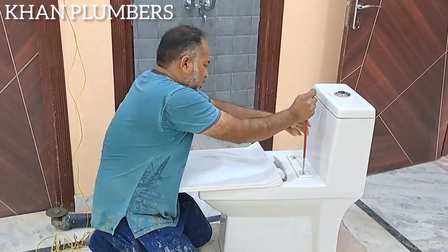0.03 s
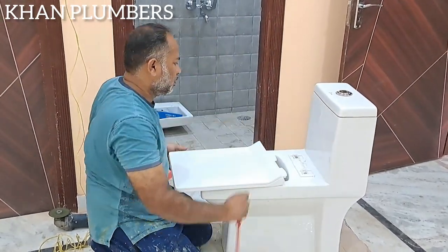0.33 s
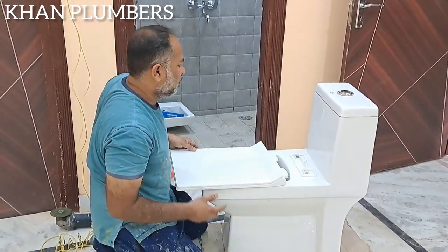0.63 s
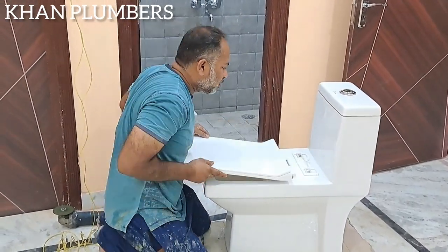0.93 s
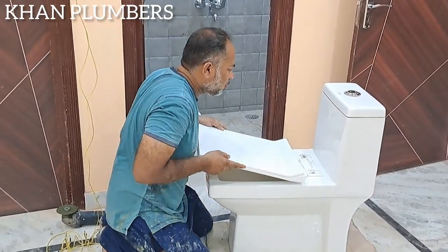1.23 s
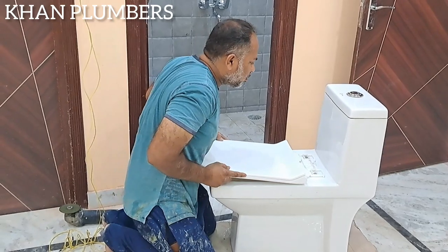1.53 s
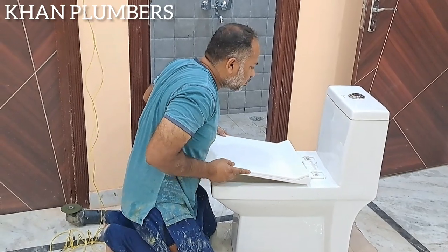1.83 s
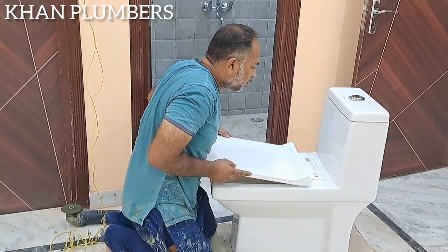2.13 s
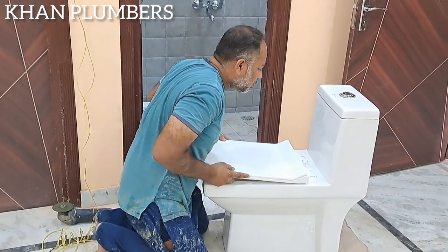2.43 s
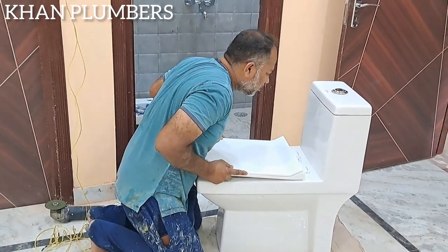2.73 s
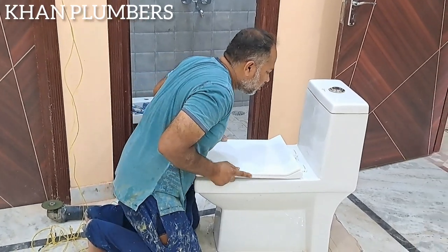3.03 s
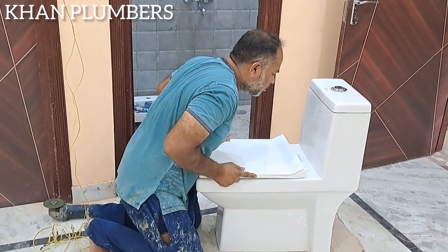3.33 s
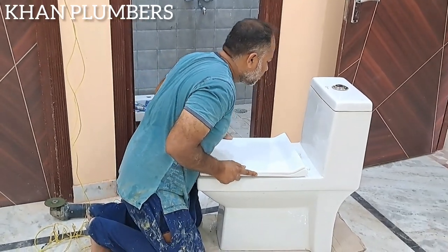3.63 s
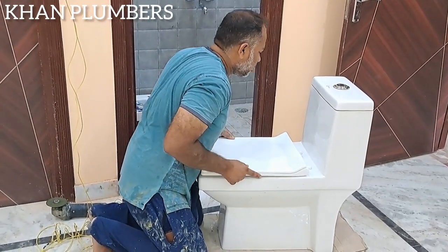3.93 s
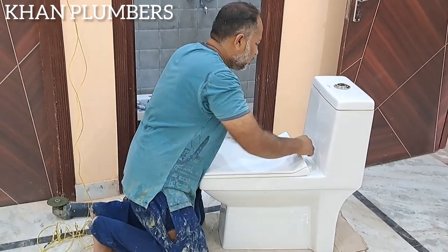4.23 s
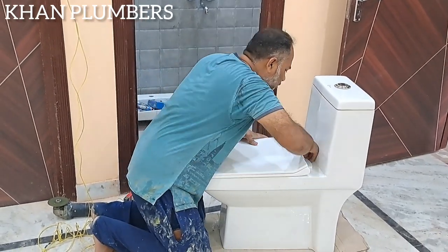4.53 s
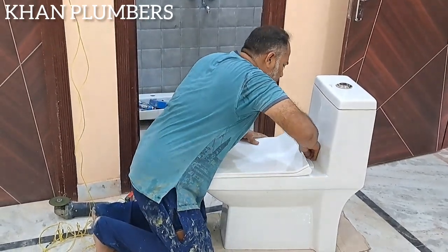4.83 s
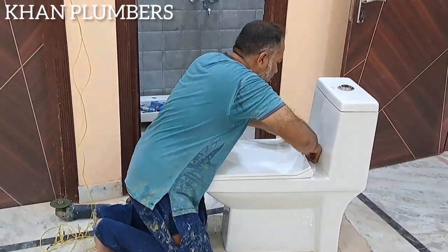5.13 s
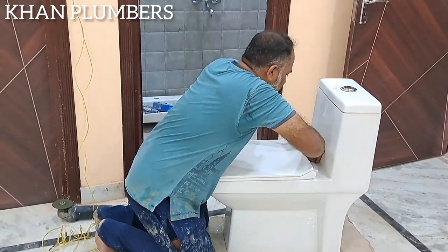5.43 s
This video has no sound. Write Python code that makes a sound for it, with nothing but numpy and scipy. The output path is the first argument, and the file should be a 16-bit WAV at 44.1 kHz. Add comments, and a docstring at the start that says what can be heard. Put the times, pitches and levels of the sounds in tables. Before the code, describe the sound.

A screwdriver bounces on a stone floor with a few quick ringing clicks. Hard plastic clacks follow at uneven intervals as a toilet seat is set down, rocked and pressed onto a ceramic bowl, which answers later with a low hollow thump. Dull body shuffles, short scrapes and thin hinge squeaks fill the gaps. Every contact echoes in the tiled room, stronger in the right microphone, above faint hiss and rumble.

```python
"""A bare tiled room with a stone floor, ringing after every contact. A screwdriver is put down and
clatters; a plastic toilet seat is lifted, set on its ceramic bowl, shifted and pressed home.
The seat clacks and flexes as it rocks from edge to edge, and its weight makes the hollow bowl boom.
Hinges squeak, arms and knees shuffle and hands rub, over faint hiss and a low rumble.
The right microphone faces the work."""
import sys
import numpy as np
from scipy import signal
from scipy.fft import rfft, irfft, next_fast_len
from scipy.io import wavfile
from scipy.ndimage import map_coordinates

SR = 44100
rng = np.random.default_rng(int(sys.argv[2]) if len(sys.argv) > 2 else 0)


def persist_wave(psi):
    """Save psi, clipped to +-1, as 16-bit WAV."""
    counts = np.round(np.clip(psi, -1, 1) * 32767).astype(np.int16)
    wavfile.write(sys.argv[1], SR, np.atleast_2d(counts).T)


N = 246519


def amp(db):
    """Decibels to gain."""
    return 10 ** (np.asarray(db) / 20)


def unit_rms(x):
    """x scaled to an rms of 1."""
    return x / np.sqrt(np.mean(x ** 2) + 1e-20)


def curve_at(points, hz):
    """Read (freq_hz, value) breakpoints on a log frequency axis."""
    freqs, values = np.transpose(points)
    return np.interp(np.log(hz + 1), np.log(freqs), values)


def eq(x, gain):
    """Shape x with the response gain(hz)."""
    size = next_fast_len(x.shape[-1] + SR // 4)
    return irfft(rfft(x, size) * gain(np.fft.rfftfreq(size, 1 / SR)), size)[..., :x.shape[-1]]


def resonances(modes, hz):
    """Joint gain of steep-sided peaks, each (pitch_hz, width_hz, level_db)."""
    peaks = (amp(db) / (1 + ((hz * hz - pitch * pitch) / (width * hz + 1)) ** 2)
             for pitch, width, db in modes)
    return np.sqrt(sum(peak ** 2 for peak in peaks))


def impulse(gain, size=8192):
    """A minimum-phase hit with the spectrum gain(hz): attack first, ring after."""
    cepstrum = irfft(np.log(gain(np.fft.rfftfreq(size, 1 / SR)) + 1e-6))
    cepstrum[1:size // 2] *= 2
    cepstrum[size // 2 + 1:] = 0
    return irfft(np.exp(rfft(cepstrum)))


def add(track, start_s, sound):
    """Mix a sound into a stereo track."""
    part = track[:, max(round(start_s * SR), 0):][:, :sound.shape[-1]]
    part += sound[..., :part.shape[-1]]


# How alike the room sounds left and right: freq_hz, correlation
STEREO_LIKENESS = [(100, 0.94), (270, 0.88), (450, 0.72), (800, 0.046), (1500, 0.0067)]
def diffuse(pair):
    """Two unrelated signals become a diffuse field: long waves reach both microphones alike."""
    angle = lambda hz: np.arccos(np.clip(curve_at(STEREO_LIKENESS, hz), -1, 1)) / 2
    mid, side = eq(pair, lambda hz: np.array([np.cos(angle(hz)), np.sin(angle(hz))]))
    return np.array([mid + side, mid - side])


# Reverb time of the tiled room: freq_hz, t60_s
ROOM_DECAY = [(100, 1.2), (170, 1.14), (280, 0.85), (480, 0.89), (900, 0.95), (1800, 0.82), (3200, 0.67),
              (5000, 0.61), (7000, 0.49), (10000, 0.36), (15000, .27)]
def in_room(sound, direct_db, crack_s=.0014, build_s=.0019, walls_db=-11, walls_s=.035, echoes=20):
    """A short direct crack, a few wall echoes and a dense tail that dies faster in the treble."""
    hz, t, noise = signal.stft(rng.standard_normal((2, SR * 5 // 4)), SR, nperseg=256)
    t60 = curve_at(ROOM_DECAY, hz)[:, None]
    fade = amp(-60 * t / t60) * np.sqrt(2 * np.log(1000) / (t60 * SR))  # equal energy in every band
    response = signal.istft(noise * fade, SR, nperseg=256)[1]
    age = np.arange(response.shape[1]) / SR
    response *= 1 - np.exp(-age / build_s)
    for channel in response:
        delays = (rng.uniform(0.092, 1, echoes) * walls_s * SR).astype(int)
        channel[delays] += amp(walls_db) * rng.standard_normal(echoes) / np.sqrt(echoes)
    # sound leaves the whole surface, so even the first arrival is spread over a few milliseconds
    crack_age = age[age < 10 * crack_s]
    crack = rng.standard_normal((2, len(crack_age))) * np.exp(-crack_age / crack_s)
    add(response, 0, amp(direct_db) * crack / np.linalg.norm(crack, axis=1, keepdims=True))
    return signal.fftconvolve(sound[None], diffuse(response), axes=1)


def wobble(knots_per_s):
    """A smooth random curve as long as the scene."""
    knots = rng.standard_normal(int(N * knots_per_s / SR) + 4)
    return map_coordinates(knots, [np.arange(N) * knots_per_s / SR])


# Colour of the steady hiss: freq_hz, gain_db
HISS_EQ = [(25, -14), (55, -11), (170, -7.5), (270, -16.5), (500, -19), (800, -19), (1500, -17.5),
           (3200, -27.5), (5000, -21.5), (7500, -20.5), (10000, -21.5), (16000, -20.5)]
# Level of the low rumble, swelling and fading with the work, under its waver: time_s, level_db
RUMBLE_LEVEL = [(0.0, -69), (0.17, -80), (0.26, -52), (0.67, -58), (1.26, -61), (1.85, -74), (2.01, -64.5),
                (2.21, -77), (2.29, -54.5), (3.56, -64.5), (3.71, -81), (3.83, -52), (4.03, -81.5),
                (4.16, -55), (4.95, -87.5), (5.23, -82), (5.26, -67), (5.59, -90)]
def room_tone(hiss_db=-65, rumble_hz=51.3, width_hz=45, waver_db=5.5):
    """Faint steady room noise and a low rumble that comes and goes."""
    noise = lambda: diffuse(rng.standard_normal((2, N)))
    hiss = eq(noise(), lambda hz: amp(curve_at(HISS_EQ, hz)))
    rumble = eq(noise(), lambda hz: resonances([(rumble_hz, width_hz, 0)], hz))
    rumble_db = np.interp(np.arange(N) / SR, *np.transpose(RUMBLE_LEVEL))
    rumble_db += waver_db * wobble(knots_per_s=9)
    return amp(hiss_db) * unit_rms(hiss) + amp(rumble_db) * unit_rms(rumble)


# Thin squeaks and tinks of the hinges: start_s, length_s, pitch_hz, width_hz, level_db
HINGE_RUBS = [(0.168, 0.06, 1570, 130, -8), (0.160, .012, 5500, 5800, -15), (1.74, .1, 3130, 150, -9),
              (2.97, .09, 2150, 520, -9), (5.36, .11, 5055, 60, -1.5)]
def hinge_squeaks():
    """Metal fittings rub briefly, each at its own resonance."""
    out = np.zeros((2, N))
    for start_s, length_s, pitch_hz, width_hz, level_db in HINGE_RUBS:
        rub = rng.standard_normal(int(length_s * SR))
        ring = impulse(lambda hz: resonances([(pitch_hz, width_hz, level_db)], hz))
        squeak = signal.fftconvolve(rub / np.linalg.norm(rub), ring)
        add(out, start_s, in_room(squeak, direct_db=-36))
    return out


def friction(length_s, slips_per_s, lateness):
    """Random slips under a pressure that swells and fades; lateness 1 peaks midway, less peaks sooner."""
    n = int(length_s * SR)
    slips = rng.standard_normal(SR) * (rng.random(SR) < slips_per_s / SR)
    pressure = np.sin(np.pi * np.linspace(0, 1, n) ** lateness)
    return unit_rms(slips[:n] * pressure) / np.sqrt(n)  # total energy 1


# Arms and knees shift their weight: start_s, length_s, level_db, centre_hz, width_hz
WEIGHT_SHIFTS = [(0.221, 0.17, 19, 160, 175), (0.338, .085, 28, 275, 250), (0.642, 0.023, 12.5, 203, 202),
                 (0.955, 0.184, 28.5, 135, 54.64), (1.024, 0.05, 12.5, 412, 295),
                 (1.418, 0.058, 21, 282, 112), (1.737, .03, 15.5, 252, 91.5), (2.11, 0.26, 22, 261, 99)]
def body_shuffles(cutoff_hz=680):
    """Padded contacts push only the low notes of the room."""
    out = np.zeros((2, N))
    for start_s, length_s, level_db, centre_hz, width_hz in WEIGHT_SHIFTS:
        band = [(centre_hz, width_hz, level_db)]
        push = impulse(lambda hz: resonances(band, hz) / np.hypot(1, (hz / cutoff_hz) ** 4))
        shuffle = signal.fftconvolve(friction(length_s, slips_per_s=2000, lateness=0.51), push)
        add(out, start_s, in_room(shuffle, direct_db=-13.5))
    return out


# Broad snap of plastic on ceramic: freq_hz, gain_db
SNAP_EQ = [(40, -25), (110, -23), (200, -12), (350, -7), (700, 4), (1200, 1.5), (2200, 1.5), (3200, -2),
           (6000, -5.5), (10000, -2.5), (16000, -5)]
# Stiff modes of the seat's shell: pitch_hz, width_hz, level_db
SHELL_MODES = [(372, 78, -0.8), (462, 170, 0.5), (549, 39, 3), (818, 120, 3.5), (892, 25, 1),
               (1055, 30, -0.5), (1576, 85, 4), (1715, 37, 4), (1883, 260, 3), (2200, 120, 1.5),
               (2420, 56, -1.5), (4920, 1300, -1.5), (7840, 1400, -5)]
def plastic_tone(hz):
    """Colour of the seat's shell: a broad snap with its modes on top."""
    return np.hypot(amp(curve_at(SNAP_EQ, hz)), resonances(SHELL_MODES, hz))


# Seat and clothes slide under the hands: start_s, length_s, level_db, centre_hz
HAND_SLIDES = [(0.268, 0.21, -12.5, 1900), (0.40, 0.12, -4.5, 10790), (1.352, 0.12, -5.5, 1950),
               (1.552, 0.078, -24.5, 6600), (2.129, 0.069, -19, 7400), (2.188, 0.097, -4, 2880),
               (2.926, 0.23, -17, 4940), (5.047, 0.21, -36, 6500), (5.232, 0.33, -22.5, 10500),
               (5.36, .12, -20.5, 3700)]
def hand_slides(peak_db=6, relative_width=.4, reach_hz=3980):
    """Sliding is a run of tiny slips that excite the shell; finer scrapes reach higher."""
    out = np.zeros((2, N))
    for start_s, length_s, level_db, centre_hz in HAND_SLIDES:
        peak = [(centre_hz, relative_width * centre_hz, peak_db)]
        colour = lambda hz: np.hypot(plastic_tone(hz), resonances(peak, hz))
        cutoff_hz = centre_hz + reach_hz
        slip = impulse(lambda hz: colour(hz) / np.hypot(1, (hz / cutoff_hz) ** 3))
        scrape = signal.fftconvolve(friction(length_s, slips_per_s=1500, lateness=.9), slip)
        add(out, start_s, amp(level_db) * in_room(scrape, direct_db=-9))
    return out


# Ring of the shaft and handle: pitch_hz, width_hz, level_db
TOOL_MODES = [(1430, 290, -4), (2110, 100, -7.5), (2870, 110, 2), (4617, 170, 2), (5455, 380, 2.5),
              (6130, 450, 2.5), (6940, 320, 6.5), (7940, 500, 1.5), (11400, 2600, 2.5)]
# Colour of the clatter on stone: freq_hz, gain_db
CLATTER_EQ = [(60, -26), (200, 0.5), (380, 2.5), (620, -9.5), (850, 2.5), (1200, -7), (2500, 3),
              (4000, 1.5), (8000, 3.5), (12000, 1.5), (16000, 0.5)]
# The screwdriver hits the floor: start_s, clatter_db, ring_db, direct_db, per_bounce_db
TOOL_HITS = [(0.524, 10.5, 8, -14, -7), (0.6542, 9.5, 18, -1.5, -2.5), (0.712, 4.5, 6, -7, -2.5),
             (0.757, 4, 3, -5, -9.5)]
def screwdriver(clicks=3, first_flight_s=.0098, flight_ratio=0.42):
    """Handle and tip land in turn and rebound ever faster, ringing the shaft."""
    out = np.zeros((2, N))
    for start_s, clatter_db, ring_db, direct_db, per_bounce_db in TOOL_HITS:
        clatter = lambda hz: amp(clatter_db + curve_at(CLATTER_EQ, hz))
        click = impulse(lambda hz: np.hypot(clatter(hz), amp(ring_db) * resonances(TOOL_MODES, hz)))
        for bounce in range(clicks):
            flown_s = first_flight_s * (1 - flight_ratio ** bounce) / (1 - flight_ratio)
            add(out, start_s + flown_s, amp(bounce * per_bounce_db) * in_room(click, direct_db))
    return out


# Low bending modes of the seat: pitch_hz, width_hz, level_db
FLEX_MODES = [(210.5, 74, 0), (288.8, 62, 1)]
def seat_clack(clack_db, tilt_db, cutoff_hz, flex_db, ring_hz, width_hz, ring_db):
    """Harder contacts are brighter; each bends the seat and favours the modes of the struck spot."""
    def spectrum(hz):
        octaves_up = np.log2(np.hypot(1, hz / 1500))
        force = amp(clack_db + tilt_db * octaves_up) / np.hypot(1, (hz / cutoff_hz) ** 3)
        spot = resonances([(ring_hz, width_hz, ring_db)], hz)
        shell = plastic_tone(hz) * np.hypot(force, spot)
        return np.hypot(shell, amp(flex_db) * resonances(FLEX_MODES, hz))
    return in_room(impulse(spectrum), direct_db=-11.5)


# The seat lands on one edge and rocks onto the other: start_s, rock_s, edge_gain_db, clack_db,
# tilt_db_per_octave, cutoff_hz, flex_db, ring_hz, width_hz, ring_db
SEAT_LANDINGS = [ (0.780, .033, 2.5, 4.5, -4, 8130, 21.5, 2000, 950, 12),
                 (1.141, .009, -6, 6.5, -0.65, 10040, 29.5, 298, 91, 34.5),
                 (1.884, .019, -1.5, 3.5, -3.5, 18000, 24.5, 2410, 584, 15.5),
                 (2.394, .022, 2, -1.5, -6.5, 8900, 26.5, 1006, 240, 16),
                 (2.530, 0.011, -15, -9, -5.5, 6170, 9, 998, 245, 9.5),
                 (2.660, .024, -1, -11, -2, 8730, 18.5, 972, 254, 2),
                 (3.247, .007, -16.5, 24, -4.5, 14560, 31, 927, 320, 34.5),
                 (3.5379, .007, 9.5, -0.5, 2.5, 18440, 6.5, 3550, 970, 9),
                 (4.047, 0.025, 1, -5, -2.5, 6870, 13.5, 2260, 800, 1.5),
                 (4.110, .007, -12.5, -2.5, 0, 5860, 8.5, 1890, 800, 1),
                 (4.187, .015, -4.5, 13, 2.5, 6380, 25, 2340, 950, 16),
                 (4.555, .011, -0.5, -4, -2.5, 9640, -1.5, 1250, 1092, 4),
                 (5.224, .022, -9.5, -11.5, -2.3, 11000, 4, 407, 112.6, 5.5)]
def seat_landings(settle_s=.018):
    """Three contacts a landing: a bright first edge, the other edge with the weight, a soft settling."""
    out = np.zeros((2, N))
    for start_s, rock_s, edge_gain_db, *tone in SEAT_LANDINGS:
        clack_db, tilt_db, cutoff_hz, flex_db, ring_hz, width_hz, ring_db = tone
        edge = seat_clack(clack_db - 1.5, tilt_db + 1.5, cutoff_hz, flex_db - 2, ring_hz, width_hz, ring_db)
        weight = seat_clack(*tone)
        settle = seat_clack(clack_db - 4, tilt_db, cutoff_hz, flex_db - 3, ring_hz, width_hz, ring_db - 4)
        add(out, start_s, amp(edge_gain_db) * edge)
        add(out, start_s + rock_s, weight)
        add(out, start_s + rock_s + settle_s, settle)
    return out


# Notes of the air in the bowl: pitch_hz, level_db, t60_s
BOWL_AIR_MODES = [(168.4, 3.5, 0.54), (138.2, -7.5, .25), (324, -21.5, 0.82), (404.5, -22, 0.8)]
# Thump of the heavy ceramic body: pitch_hz, width_hz, level_db
BOWL_BODY_MODES = [(144.7, 41, 52)]
# The seat's weight lands on the bowl: start_s, level_db
BOWL_HITS = [(4.049, -38), (4.198, -14), (4.555, -54.5), (5.221, -29)]
def bowl_booms(attack_s=0.018):
    """The covered bowl booms at the pitch of its enclosed air, and its body thumps the room."""
    out, t = np.zeros((2, N)), np.arange(SR) / SR
    boom = sum(amp(db - 60 * t / t60) * np.sin(2 * np.pi * hz * t) for hz, db, t60 in BOWL_AIR_MODES)
    boom *= 1 - np.exp(-t / attack_s)
    thump = impulse(lambda hz: resonances(BOWL_BODY_MODES, hz))
    for start_s, level_db in BOWL_HITS:
        add(out, start_s, amp(level_db) * boom)
        add(out, start_s, amp(level_db) * in_room(thump, direct_db=-4.5))
    return out


# Stereo balance of the work: freq_hz, left_minus_right_db
BALANCE = [(150, -0.5), (300, -2.4), (550, -2), (1000, -4.5), (2200, -6), (4500, -11), (7000, -14),
           (9500, -0.5), (13000, -3)]
def scene():
    """The work over room tone; the left microphone is shaded from it, most in the treble."""
    def pan(hz):
        left = amp(curve_at(BALANCE, hz))
        return np.array([left, np.ones_like(hz)]) * np.sqrt(2 / (1 + left ** 2))  # constant power
    work = seat_landings() + bowl_booms() + screwdriver()
    work += body_shuffles() + hand_slides() + hinge_squeaks()
    return eq(work, pan) + room_tone()


# Response of the microphone: freq_hz, gain_db
MIC_EQ = [(7800, -2.5), (9200, -11), (12500, -11), (15500, -17)]
BAND_LIMIT_HZ = 16150
def record(dry):
    """The microphone dulls the top octave; peaks clip at full scale and nothing passes the band limit."""
    coloured = eq(dry, lambda hz: amp(curve_at(MIC_EQ, hz)))
    return eq(np.clip(coloured, -1, 1), lambda hz: hz < BAND_LIMIT_HZ)


dry = scene()
out = record(dry)
persist_wave(out)
```